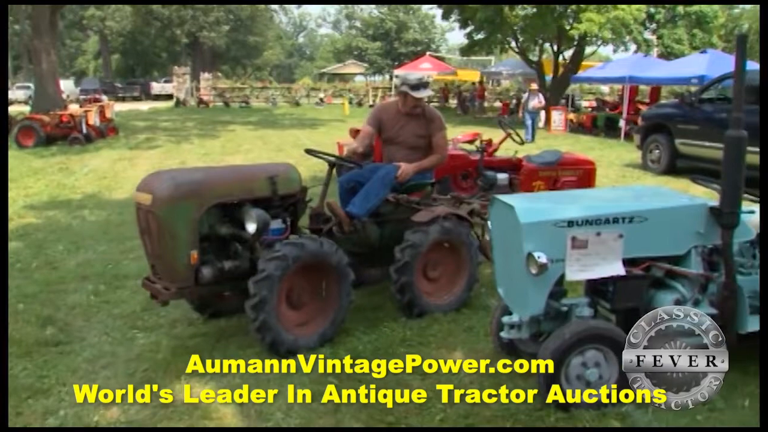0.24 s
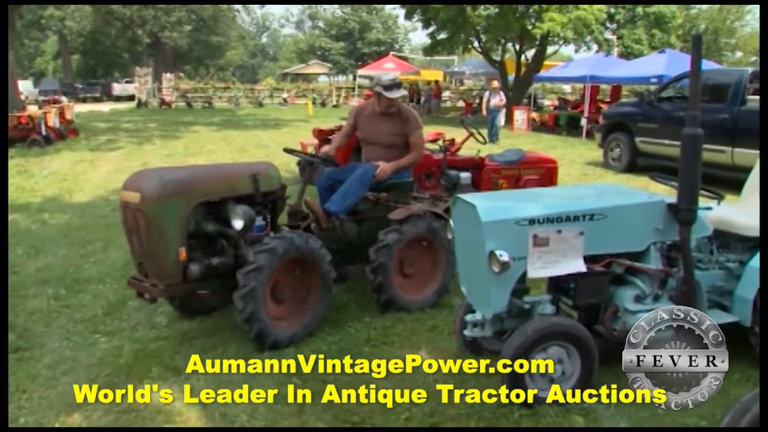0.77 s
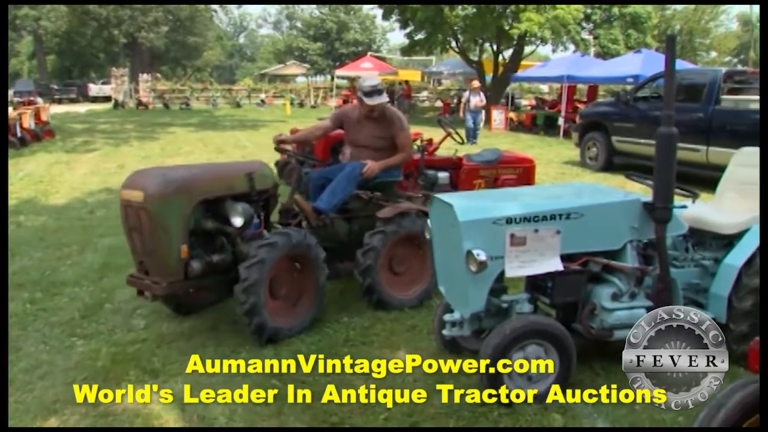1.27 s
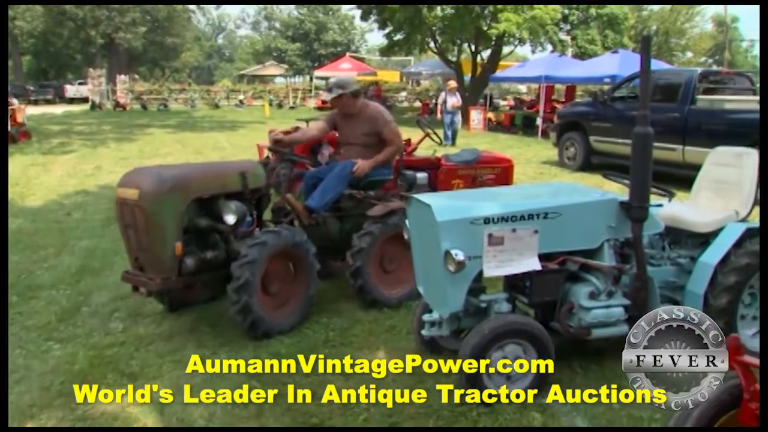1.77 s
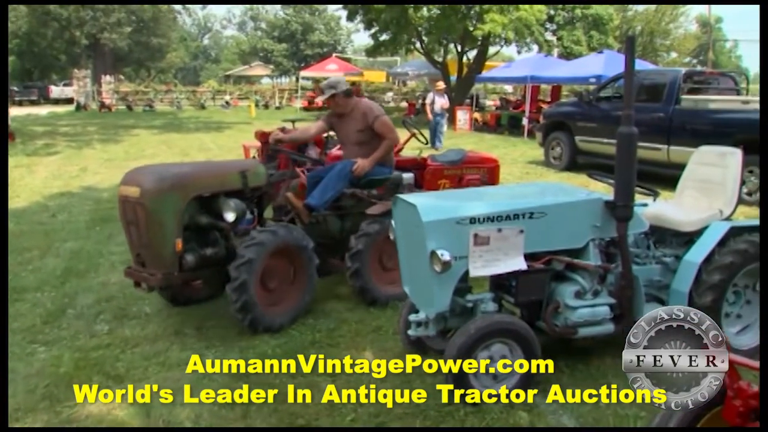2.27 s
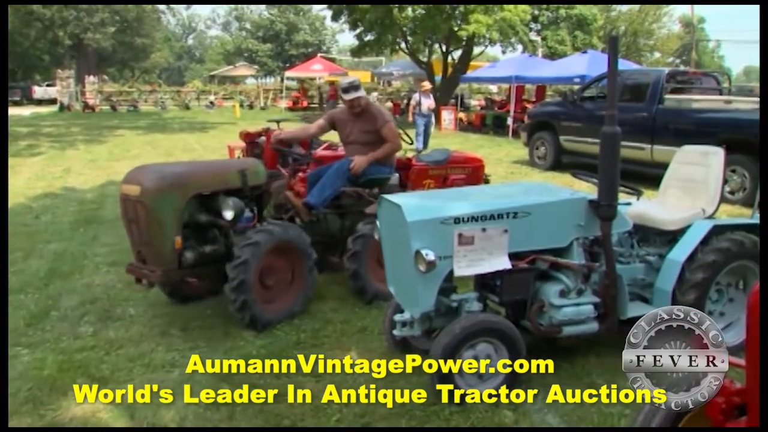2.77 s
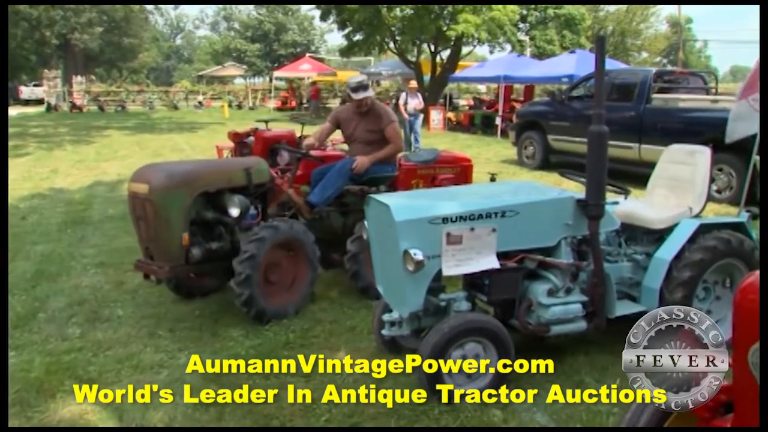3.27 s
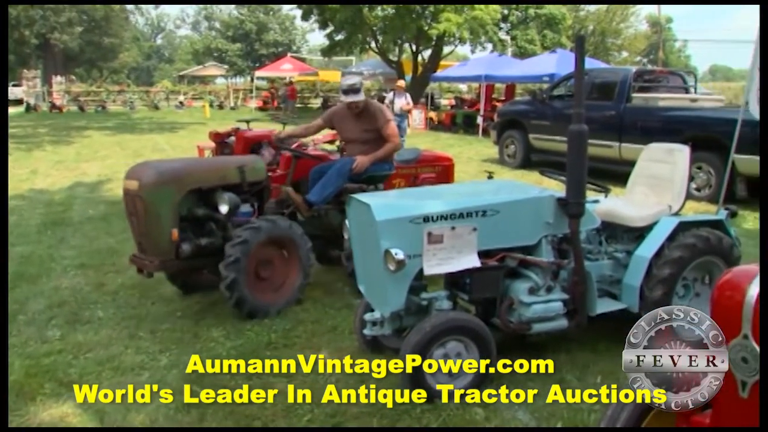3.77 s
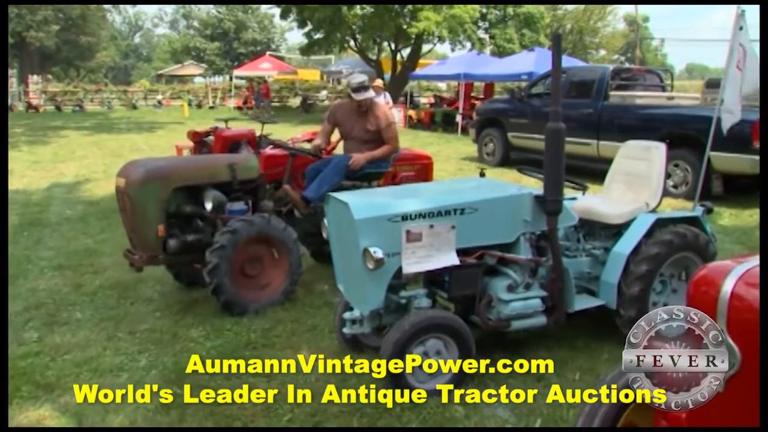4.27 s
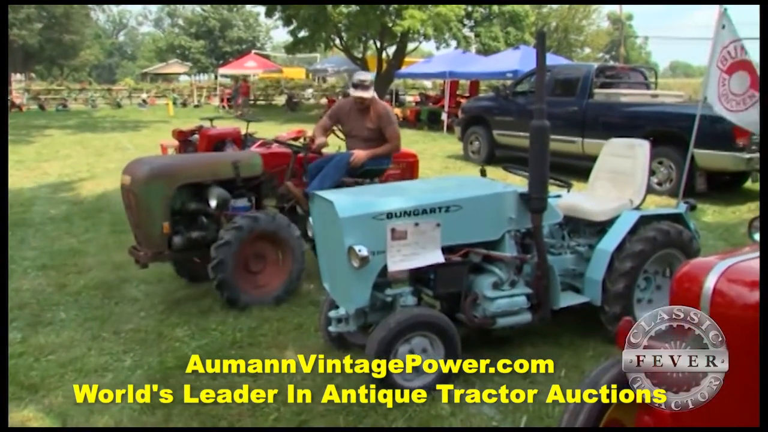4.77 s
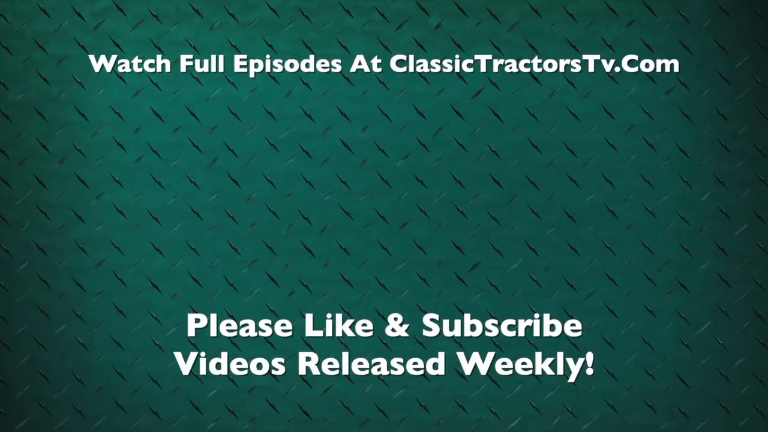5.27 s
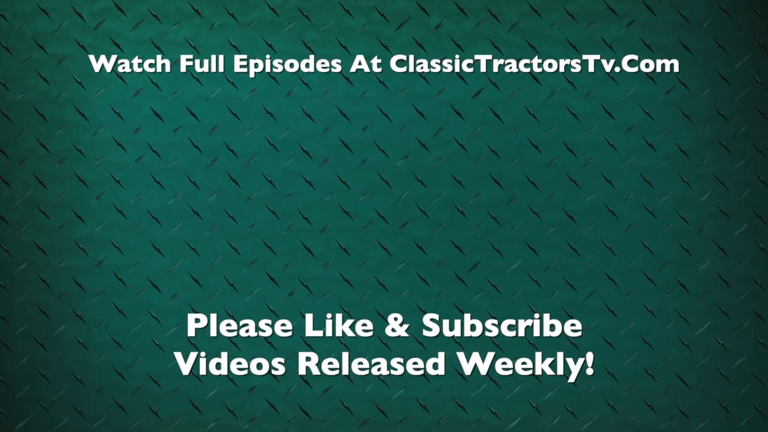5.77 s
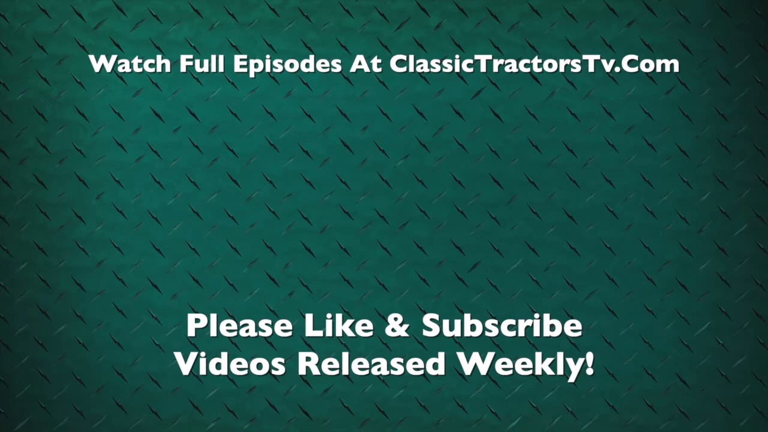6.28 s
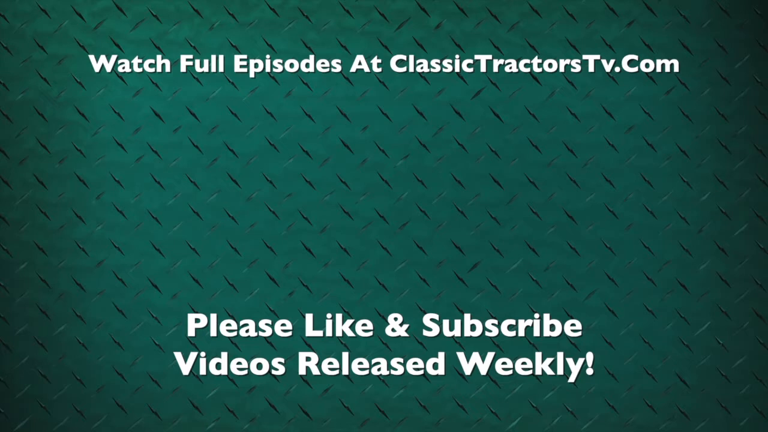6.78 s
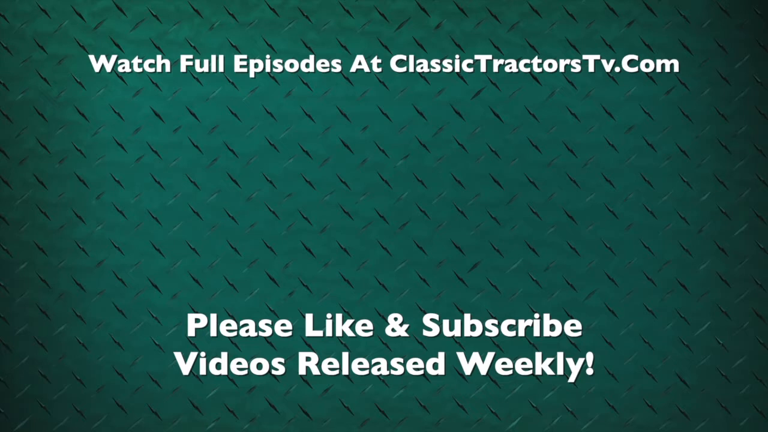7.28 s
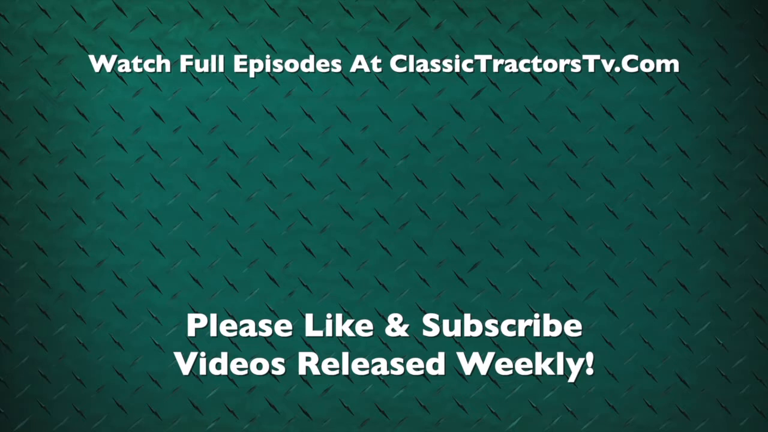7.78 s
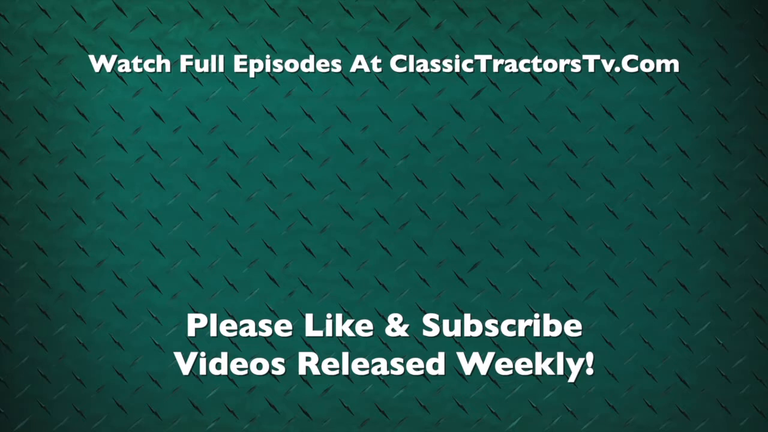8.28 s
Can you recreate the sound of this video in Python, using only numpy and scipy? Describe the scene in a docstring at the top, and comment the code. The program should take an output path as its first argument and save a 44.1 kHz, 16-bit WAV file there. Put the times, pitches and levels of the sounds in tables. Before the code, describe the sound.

Already running from the first moment, an old one-cylinder diesel tractor chugs fast and evenly outdoors, with no echo. Each turn gives a rounded low puff, a breathy chuff, and knocks and ticks from block and injector. Speed dips early, then climbs and works a little harder, with hollow hums shifting in tone. Mono microphone metres away. The sound never cuts off, only fades over the last half second.

```python
"""Single-cylinder two-stroke diesel of an old tractor creeping over a lawn, near 1000 turns/min, metres away.
Each turn, gas pulses ring silencer, pipe and ducts; pump, firing and piston blows ring block and panels.
Filtered noise gives the rush of fan and gears, and a thin hiss that dies away early.
One crank times every blow and puff; the sound fades out with the engine still running."""
import sys
import numpy as np
from scipy import signal
from scipy.fft import rfft, irfft, next_fast_len
from scipy.io import wavfile
from scipy.ndimage import uniform_filter1d

SR = 44100
rng = np.random.default_rng(int(sys.argv[2]) if len(sys.argv) > 2 else 0)


def pcm_store(signal):
    """Save signal as 16-bit PCM."""
    levels = np.round(np.clip(np.atleast_2d(signal), -1, 1) * 32767)
    wavfile.write(sys.argv[1], SR, levels.astype(np.int16).T)


N = 376846
TIME = np.arange(N) / SR  # s

# crank speed: t/s, speed/(turns/s)
SPEED = [(0.0, 16.517), (0.4, 15.795), (0.8, 15.472), (1.3, 15.394), (1.7, 15.395), (2.2, 15.92),
         (2.7, 16.457), (3.2, 17.066), (3.7, 17.605), (4.2, 17.912), (4.8, 17.924), (5.4, 17.865),
         (6.0, 17.623), (6.5, 17.417), (7.0, 17.214), (7.4, 17.21), (7.9, 16.91), (8.55, 16.749)]
START_TURN, CRUISE_TURNS_PER_S = -.61, 17
# engine pull beyond what speed alone needs: t/s, effort/dB
EFFORT = [(0, 0.3), (.4, 0.5), (.8, -1), (1.6, -1.3), (2.2, -1.2), (2.85, 3), (3.5, 0.2), (5.5, 1.5),
          (6.5, 1.5), (7.3, 0.8), (8.2, 3)]
# level laws: level at cruise/dB, speed slope/(dB per turn/s), effort slope/(dB/dB)
THUD_LAW = (-20, 0.25, 0.89)
BARK_LAW = (-41, 0.44, 0.13)
CLATTER_LAW = (-32.5, 0, 0.56)
TICK_LAW = (-57.5, 0.62, 0.54)
FAN_LAW = (-39, 0.44, 0.45)
# how far the pump side is turned away: t/s, share/(0-1)
AWAY = [(0, 0.3), (3, 0.9), (4.4, 0), (8.5, 0.1)]

# gas flow per turn: crank position/turns, bell sigma/ms, strength (sign = flow direction)
PUFFS = [(-.462, 1.5, .36), (-.342, 1.85, 1.2), (-.046, 1.85, 1.88), (.008, 1.4, -.75)]
# silencer resonances: f/Hz, width/Hz, gain/dB
SILENCER = [(55.8, 7.6, 0.5), (145.7, 9, 2), (183.6, 24.2, 17), (227.7, 37, 11)]
# silencer chamber, fuller with speed: f/Hz, width/Hz, gain at cruise/dB
CHAMBER = [(97.5, 42, -1.5)]
CHAMBER_SPEED_DB = 1.5  # dB per extra turn/s
# radiation of the small outlet: f/Hz, gain/dB
OUTLET = [(17, -46), (35, 2.5), (50, 7), (230, 1), (400, -6), (900, -7)]
# pipe resonances: f/Hz, width/Hz, gain/dB
PIPE = [(462, 38, 1.5), (515, 155, 0), (529, 47, 2.5), (602, 23, -3)]
# gusts through the pipe per turn: crank position/turns, gain/dB, change when turned away/dB
GUSTS = [(-.385, 2, 11.5), (-.04, 0, 1), (0, -33, 14), (0.1, -8, 2)]
GUST_DECAY_MS, GUST_ROUGH_DB = 16, -8  # turbulence trailing each gust
# exhaust port whoop: t/s, level/dB
WHOOP_LEVEL = [(0, -40), (1.2, -45.5), (2.8, -39.5), (4.2, -42.5), (5.6, -43), (7, -54)]
WHOOP_FROM_HZ, WHOOP_TO_HZ, WHOOP_S = 300, 661, 0.0141
# spectrum of the gas chuff at the port: f/Hz, relative gain/dB
CHUFF = [(500, -39), (850, 9.5), (1400, 0), (1900, 2), (2700, -7.5), (3600, -18), (6000, -36)]
# chuff before odd-firing gain: t/s, level/dB
CHUFF_LEVEL = [(0, -58), (1.3, -46), (2.8, -43), (3.6, -46), (4.7, -44.5), (6, -49), (7, -56), (8.2, -48)]

# blows on metal per turn (cam, pump, firing, piston, ports, gears): crank position/turns,
# clatter decay/ms, clatter gain/dB, tick gain/dB, tick change when turned away/dB
BLOWS = [(-.375, 6, -15, -3, -4), (-.33, 7, -9, 4.5, 3.5), (-.27, 21, -5, 8.5, 0), (-.135, 18, -5, -6, -3),
         (-.04, 22, -4.5, 4.5, 3.5), (.172, 7, -13, 0, 6)]
# block and bonnet panels: f/Hz, width/Hz, gain when facing/dB, facing t/s, facing sigma/s
BLOCK = [(925, 60, -7, 2.7, 1.1), (990, 14, -4, 5, 1.1), (1110, 22, 7, 1.2, 1.1), (1230, 25, -3, 5.2, 1.3),
         (1328, 16, 6.5, 5.6, 1.2), (1380, 50, -2, 1, 1.4), (1550, 70, 1.5, 0, .7), (1600, 70, -4, 6, 1.1),
         (1738, 20, 0, 5.5, 3), (1915, 50, -1.5, 3.5, 2), (2240, 70, -1.5, 1.8, 1.3),
         (2400, 100, -4, 5.4, 2), (2620, 90, -1, 1, 4), (3300, 130, -2, 3.3, 1.8), (4680, 160, 5, .1, .9),
         (4400, 240, -1, 3, .8), (4760, 140, -5, 6, 3)]
# injection line resonances: f/Hz, width/Hz, gain/dB
INJECTOR = [(4440, 80, -14), (5485, 90, 2), (6850, 45, 5.5), (7490, 210, 9), (7810, 135, 9.5)]
# spectrum of the dull clatter: f/Hz, relative gain/dB
CLATTER = [(60, 8.5), (240, 3.5), (340, 6.5), (410, -1.5), (560, 5.5), (750, -2), (1200, -6.5), (1800, -6),
           (2100, -9.5), (2800, -9.5), (3350, -17), (3750, -25), (4700, -25), (5200, -37)]
# spectrum of the bright ticks: f/Hz, relative gain/dB
TICK = [(2000, -12), (3500, 4), (4700, -12), (5100, -19), (5600, 0.5), (6200, -5.5), (7000, -3.5),
        (7650, -2), (8500, -4.5), (9800, -24), (11000, -1), (12600, -3.5), (13700, -25)]
# cylinder head resonances, per pass: f/Hz, width/Hz, gain/dB
HEAD = [(3390, 220, 4), (4500, 440, -12)]
# ignition ping before odd-firing gain: t/s, level/dB
HEAD_LEVEL = [(0, -56), (.5, -65), (1.7, -73), (2.2, -61), (2.9, -55), (3.4, -50.5), (4, -60), (6.2, -70),
              (7.3, -56), (8.1, -60)]
# needle chirp before odd-firing gain: t/s, level/dB
NEEDLE_LEVEL = [(0, -71), (3.4, -84), (4.1, -64), (5.9, -63), (7.3, -60.5), (7.8, -72)]
# piston skirt resonances: f/Hz, width/Hz, gain/dB
SKIRT = [(994, 70, -2), (1354, 160, 1.5), (2180, 300, -11)]
# piston slap before odd-firing gain: t/s, level/dB
SLAP_LEVEL = [(0, -51), (.6, -46.5), (1.4, -43.5), (2.3, -46), (2.8, -45), (4.6, -54), (5.7, -51),
              (7, -46.5), (8.2, -46.5)]
# firings harder or softer than their neighbours: t/s, gain/dB
ODD_FIRINGS = [(.22, 2.5), (.35, 3.5), (.54, -0.5), (0.732, 1.5), (1.438, 0.5), (2.648, -1), (5.38, 1),
               (7.042, 3), (7.503, -3.5), (8.09, -1.5)]
KNOCK_SPAN_S = 0.029  # sigma

# bonnet boom resonance, per pass: f/Hz, width/Hz, gain/dB
BONNET = [(155.1, 25.8, 0)]
# bonnet boom: t/s, level/dB
BOOM = [(0, -27.5), (.4, -29), (.8, -35), (1.6, -33.5), (2.4, -30), (3.5, -33), (5.6, -27.5), (6.6, -63)]
# intake hum resonance, per pass: f/Hz, width/Hz, gain/dB
INTAKE = [(309, 22.3, 0)]
# intake hum: t/s, level/dB
HUM = [(0, -38.5), (1.3, -36), (2.7, -34.5), (3.4, -38.5), (4.2, -34), (5.5, -32.5), (6.6, -39.5),
       (8.2, -41)]
# lingering silencer resonance, per pass: f/Hz, width/Hz, gain/dB
LINGER = [(188.2, 30.8, 0)]
# lingering silencer ring: t/s, level/dB
LINGER_LEVEL = [(2.8, -35), (3.8, -34.5), (5, -36.5), (6.2, -36), (7.2, -31.5), (8.2, -33)]
# second hum, below the intake's, per pass: f/Hz, width/Hz, gain/dB
LOW_HUM = [(236.9, 42, 0)]
# second hum: t/s, level/dB
LOW_HUM_LEVEL = [(4.8, -70), (5.4, -35.5), (6.3, -38), (7.2, -33)]
# third hum, near 105 Hz, lowest of the hums, per pass: f/Hz, width/Hz, gain/dB
DEEP_HUM = [(104.5, 55, 0)]
# third hum: t/s, level/dB
DEEP_HUM_LEVEL = [(2.6, -55), (3.6, -33), (4.4, -33), (5.8, -36), (7.2, -37), (8.2, -44)]
# lower pipe note, wandering as the gas warms and cools: t/s, f/Hz, level/dB
LOWER_NOTE = [(0, 521, -49), (.4, 493, -42), (1.7, 486, -47), (2.7, 516.4, -45), (3.3, 529, -41),
              (3.7, 486, -40.5), (4.6, 486, -41), (5.8, 493.5, -33.5), (6.9, 491, -40), (8.2, 514.3, -35)]
# upper pipe note, likewise: t/s, f/Hz, level/dB
UPPER_NOTE = [(0, 584, -49), (1.1, 619, -53), (1.9, 644, -45.5), (2.7, 641, -47), (3.3, 646, -47),
              (3.8, 703, -45), (4.6, 607, -47), (5.3, 597, -57), (6.2, 610.6, -40), (7, 598, -43),
              (8.2, 602, -57)]
LOWER_WIDTH_HZ, UPPER_WIDTH_HZ = 19, 25  # per pole

# spectrum of fan and gears: f/Hz, relative gain/dB
FAN = [(25, -14), (150, 14), (400, -19), (600, 5.5), (1000, 0.5), (1800, 1), (3200, -6.5), (3750, -12),
       (4750, -18.5), (5150, -25), (6800, -26.5), (7600, -24), (8800, -30), (13500, -33)]
# spectrum of the thin hiss: f/Hz, relative gain/dB
HISS = [(2500, -15), (4500, 6), (5300, -2), (7600, 0), (9500, -6), (12500, -7)]
# hiss, dying away early: t/s, level/dB
HISS_LEVEL = [(0, -64), (.5, -61), (1, -72), (1.5, -100)]
FADE_START_S, FADE_END_S, TOP_HZ = 7.98, 8.55, 13700


def gas(crank):
    """Gas flow at the openings: a few rounded gulps and puffs per turn."""
    flow = 0
    for position, sigma_ms, strength in PUFFS:
        hits = each_turn(crank, position, jitter_ms=.09, scatter_db=.3)
        flow = flow + strength * puff(hits, sigma_ms)
    return flow


def puff(hits, sigma_ms):
    """Each impulse rounded into a Gaussian gas pulse of equal area."""
    t_s = np.arange(-SR // 50, SR // 50 + 1) / SR
    bell = np.exp(-.5 * (t_s * 10 ** 3 / sigma_ms) ** 2)
    return signal.fftconvolve(hits, bell / bell.sum(), "same")


def exhaust(flow, thud_db):
    """Flow rings the silencer; its small outlet radiates little of the deepest bass."""
    fill = undb(CHAMBER_SPEED_DB * (curves(SPEED)[0] - CRUISE_TURNS_PER_S))
    ringing = ring(flow, SILENCER) + fill * ring(flow, CHAMBER)
    return at_level(colour(ringing, OUTLET), thud_db)


def bark(crank, bark_db):
    """Ports snap open; the pipe answers with a hollow bark, roughened by turbulence."""
    away = curves(AWAY)[0]
    snaps = 0
    for position, db, away_db in GUSTS:
        hits = each_turn(crank, position, jitter_ms=0.093, scatter_db=2.0)
        snaps = snaps + undb(db + away_db * away) * hits
    tail = np.exp(-TIME[:SR // 10] * 10 ** 3 / GUST_DECAY_MS)
    swirl = signal.oaconvolve(snaps, tail)[:N] * rng.standard_normal(N)
    gust = unit(snaps) + undb(GUST_ROUGH_DB) * unit(swirl)
    band = signal.butter(3, [420, 800], "band", fs=SR, output="sos")
    return at_level(signal.sosfilt(band, ring(gust, PIPE)), bark_db)


def blowdown(crank):
    """Exhaust port opens: its resonance sweeps up in a whoop, gas leaves in a breathy chuff."""
    t_s = TIME[TIME < WHOOP_S]
    hz = WHOOP_FROM_HZ + (WHOOP_TO_HZ - WHOOP_FROM_HZ) * t_s / WHOOP_S
    swell = np.sin(np.pi * t_s / WHOOP_S) ** 2
    sweep = swell * np.sin(2 * np.pi * np.cumsum(hz) / SR)
    openings = each_turn(crank, -0.0934, jitter_ms=.1, scatter_db=2.0)
    whoop = signal.oaconvolve(openings, sweep)[:N]
    puffs = each_turn(crank, -.07, jitter_ms=.1, scatter_db=1.0)
    chuff = rattle(puffs, decay_ms=6, repeat=.75, rise_ms=6)
    chuff = colour(chuff + panels(chuff), CHUFF)
    chuff = at_level(chuff, curves(CHUFF_LEVEL)[0]) * unevenness()
    return at_level(whoop, curves(WHOOP_LEVEL)[0]) + chuff


def metal(crank, clatter_db, tick_db):
    """Blows on the block ring its panels as dull clatter and the injection line as bright ticks."""
    clatter = ticks = 0
    away = curves(AWAY)[0]
    for position, decay_ms, knock_db, bright_db, away_db in BLOWS:
        hits = each_turn(crank, position, jitter_ms=.06, scatter_db=1.5)
        dull = rattle(hits, decay_ms, repeat=0.87, rise_ms=2.2)
        bright = rattle(hits, decay_ms * 0.46, repeat=0.13, rise_ms=2.6)
        clatter = clatter + undb(knock_db) * dull
        ticks = ticks + undb(bright_db + away_db * away) * bright
    clatter = colour(clatter + panels(clatter), CLATTER)
    ticks = colour(ticks + ring(ticks, INJECTOR), TICK)
    return at_level(clatter, clatter_db) + at_level(ticks, tick_db)


def knocks(crank):
    """Three crisp blows per turn: head pings at ignition, injector needle shuts, piston slaps."""
    ignitions = each_turn(crank, -0.38, jitter_ms=0.15, scatter_db=0.5)
    ping = rattle(ignitions, decay_ms=2.8, repeat=0.85, rise_ms=0.77)
    closings = each_turn(crank, -0.3, jitter_ms=0.18, scatter_db=5.0)
    needle = rattle(closings, decay_ms=2.6, repeat=0.32, rise_ms=0.74)
    slaps = each_turn(crank, -.212, jitter_ms=0.042, scatter_db=1.0)
    slap = rattle(slaps, decay_ms=2.2, repeat=0.75, rise_ms=0.9)
    return (at_level(ring(ring(ping, HEAD), HEAD), curves(HEAD_LEVEL)[0])
            + at_level(colour(ring(needle, INJECTOR), TICK), curves(NEEDLE_LEVEL)[0])
            + at_level(colour(ring(slap, SKIRT), CLATTER), curves(SLAP_LEVEL)[0]))


def sing(crank, position, note, width_hz):
    """Pipe resonance kicked once a turn, its centre and level following a curve."""
    hz, db = curves(note)
    spin = np.exp(2j * np.pi * np.cumsum(hz) / SR)
    pole = np.exp(-np.pi * width_hz / SR)
    kicks = each_turn(crank, position, jitter_ms=.04, scatter_db=.7)
    # shift the centre to 0 Hz, resonate, shift back
    envelope = signal.lfilter([1], np.poly([pole, pole]), kicks / spin)
    return at_level((envelope * spin).real, db)


def drone(crank, position, modes, level):
    """Resonance kicked once a turn rings into the next: near-steady note on crank harmonics."""
    kicks = each_turn(crank, position, jitter_ms=.06, scatter_db=.5)
    return at_level(ring(ring(kicks, modes), modes), curves(level)[0])


def fan(rush_db):
    """Rush of cooling air and gears: noise coloured by the block."""
    air = rng.standard_normal(N)
    return unit(colour(air + .5 * panels(air), FAN)) * undb(rush_db)


def hiss():
    """Thin hiss: bright filtered noise."""
    return at_level(colour(rng.standard_normal(N), HISS), curves(HISS_LEVEL)[0])


def each_turn(crank, position, jitter_ms, scatter_db):
    """Impulse whenever the crank passes a position, scattered in time and size."""
    turns = np.arange(np.ceil(crank[0] - position), np.floor(crank[-1] - position) + 1) + position
    chance = rng.standard_normal((len(turns), 2))
    at_s = np.interp(turns, crank, TIME) + jitter_ms * chance[:, 0] / 10 ** 3
    index = np.clip(at_s * SR, 0, N - 1).astype(int)
    return np.bincount(index, undb(scatter_db * chance[:, 1]), N)


def rattle(hits, decay_ms, repeat, rise_ms):
    """Each blow sets off a burst: a power share of repeating dense ringing, the rest loose rattle."""
    t_ms = TIME[:SR // 10] * 10 ** 3
    tail = np.exp(-t_ms / decay_ms) * (1 - np.exp(-t_ms / rise_ms))
    # ringing changes slowly as the tractor shows another side
    front, side = (signal.oaconvolve(hits, tail * rng.standard_normal(len(tail)))[:N] for _ in range(2))
    steady = front * np.cos(0.68 * TIME) + side * np.sin(0.64 * TIME)
    grain_db = 2.5 * np.repeat(rng.standard_normal(N // 40 + 1), 40)[:N]
    grains = rng.standard_normal(N) * undb(grain_db)
    loose = signal.oaconvolve(hits, tail)[:N] * grains
    share = np.clip(repeat, 0, 1)
    return np.sqrt(share) * unit(steady) + np.sqrt(1 - share) * unit(loose)


def panels(x):
    """Panels ring in turn, each loudest when facing the listener as the tractor rolls past."""
    return sum(ring(x, [(hz, width_hz, db)]) * np.exp(-((TIME - facing_s) / span_s) ** 2 / 2)
               for hz, width_hz, db, facing_s, span_s in BLOCK)


def unevenness():
    """Gain lifting or softening the odd firing."""
    return undb(sum(db * np.exp(-((TIME - s) / KNOCK_SPAN_S) ** 2 / 2) for s, db in ODD_FIRINGS))


def loudness(law):
    """Level/dB of an engine part from crank speed and effort."""
    cruise_db, speed_db, effort_share = law
    extra_turns_per_s = curves(SPEED)[0] - CRUISE_TURNS_PER_S
    return cruise_db + speed_db * extra_turns_per_s + effort_share * curves(EFFORT)[0]


def ring(x, modes):
    """Sum of resonances: f/Hz, width/Hz, gain/dB."""
    return sum(undb(db) * signal.lfilter(*signal.iirpeak(hz, hz / width_hz, fs=SR), x)
               for hz, width_hz, db in modes)


def colour(x, spectrum):
    """Zero-phase filter, dB interpolated over log frequency."""
    hz, db = np.transpose(spectrum)
    size = next_fast_len(N + SR // 10)
    f_hz = np.maximum(np.fft.rfftfreq(size, 1 / SR), 1)
    gain = undb(np.interp(np.log(f_hz), np.log(hz), db))
    return irfft(rfft(x, size) * gain, size)[:N]


def at_level(x, db):
    """Set the rms, taken over 0.5 s, to a dB curve."""
    return x * undb(db) / np.sqrt(uniform_filter1d(x ** 2, SR // 2))


def curves(table):
    """Table columns joined by straight lines in time."""
    s, *columns = np.transpose(table)
    return [np.interp(TIME, s, c) for c in columns]


def undb(db):
    """Decibels to gain."""
    return 10 ** (np.asarray(db) / 20)


def unit(x):
    """Scale to rms 1."""
    return x / np.sqrt(np.mean(x ** 2))


def scene():
    """One crank times every blow and puff; its speed and effort set the main levels."""
    crank = START_TURN + np.cumsum(curves(SPEED)[0]) / SR
    tailpipe = exhaust(gas(crank), loudness(THUD_LAW)) + bark(crank, loudness(BARK_LAW)) + blowdown(crank)
    blows = metal(crank, loudness(CLATTER_LAW), loudness(TICK_LAW)) + knocks(crank)
    blows = blows * unevenness()
    lower_note = sing(crank, -0.1201, LOWER_NOTE, LOWER_WIDTH_HZ)
    upper_note = sing(crank, -0.0594, UPPER_NOTE, UPPER_WIDTH_HZ)
    boom = drone(crank, -0.5522, BONNET, BOOM)
    intake = drone(crank, -.55, INTAKE, HUM)
    linger = drone(crank, -0.043, LINGER, LINGER_LEVEL)
    low_hum = drone(crank, 0.0978, LOW_HUM, LOW_HUM_LEVEL)
    deep_hum = drone(crank, -.417, DEEP_HUM, DEEP_HUM_LEVEL)
    drones = boom + intake + linger + low_hum + deep_hum
    background = fan(loudness(FAN_LAW)) + hiss()
    return (tailpipe + blows + lower_note + upper_note + drones + background)[None]


def record(dry):
    """Straight fade at the end, steep low-pass at the top."""
    fade = np.interp(TIME, [FADE_START_S, FADE_END_S], [1, 0])
    low_pass = signal.ellip(10, .2, 80, TOP_HZ, fs=SR, output="sos")
    return signal.sosfilt(low_pass, dry * fade)


dry = scene()
out = record(dry)
pcm_store(out)
```